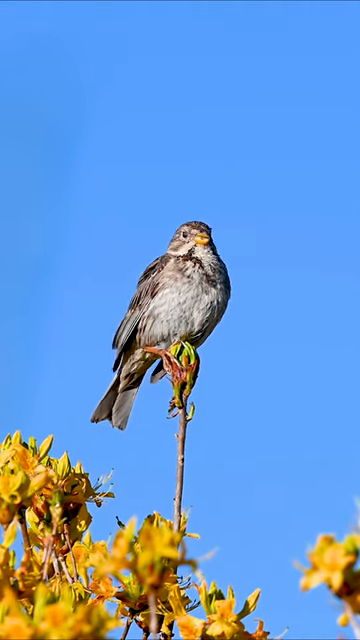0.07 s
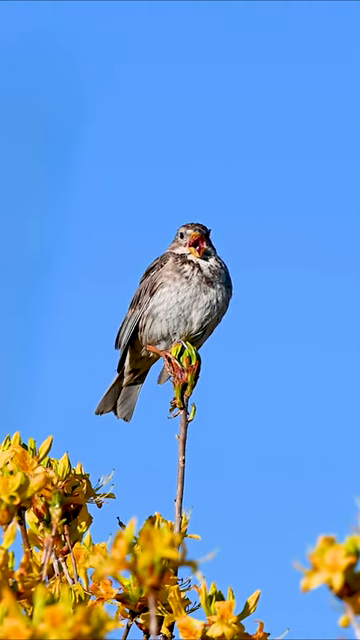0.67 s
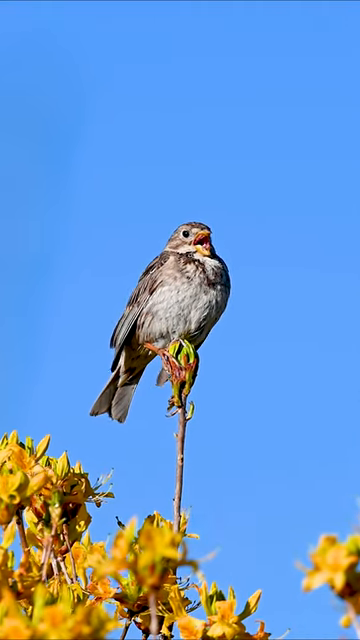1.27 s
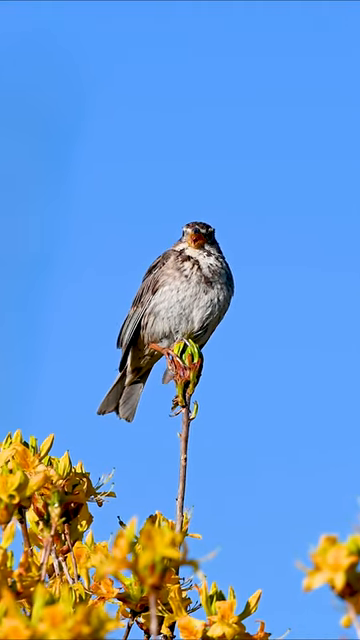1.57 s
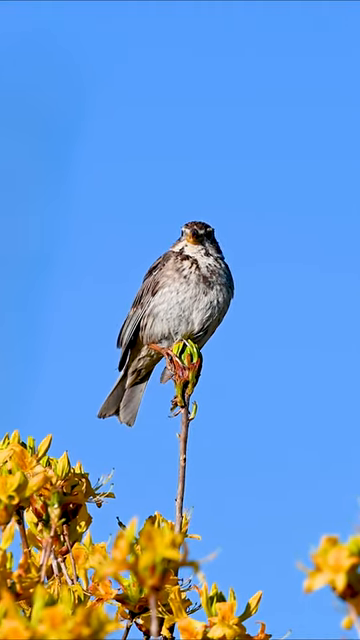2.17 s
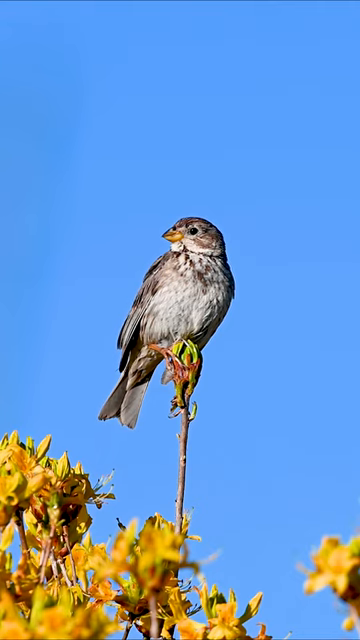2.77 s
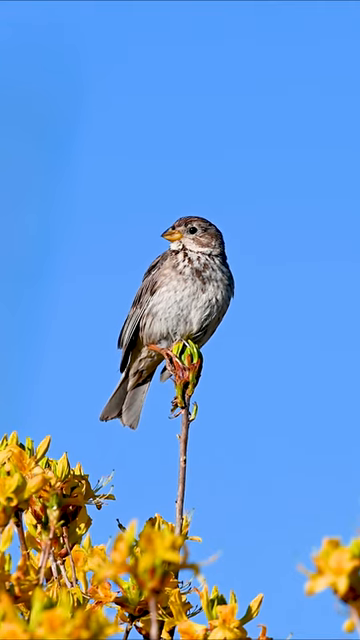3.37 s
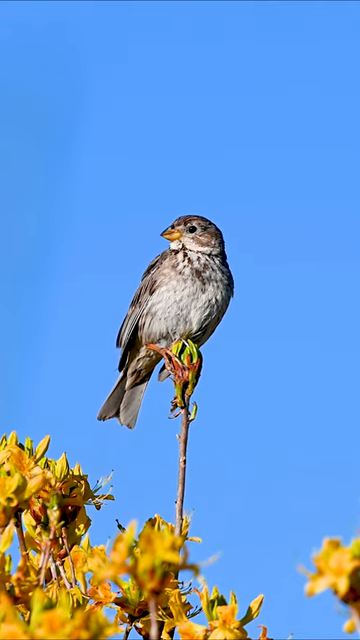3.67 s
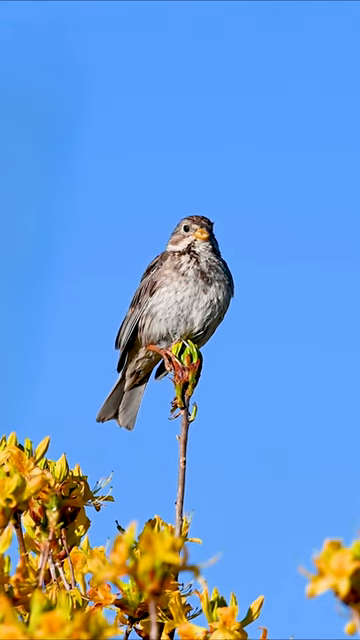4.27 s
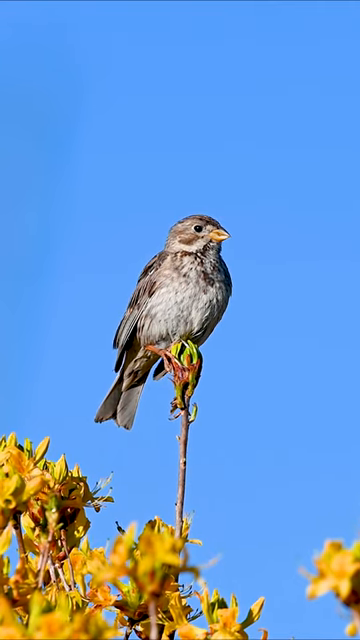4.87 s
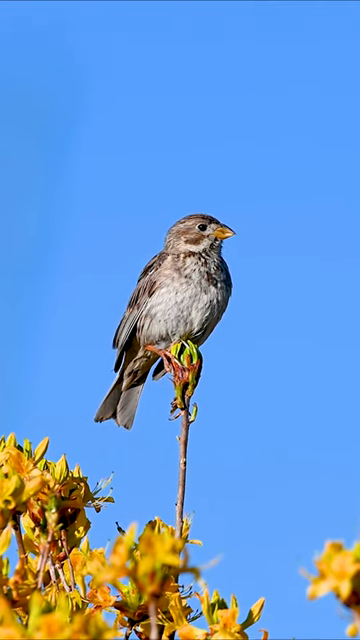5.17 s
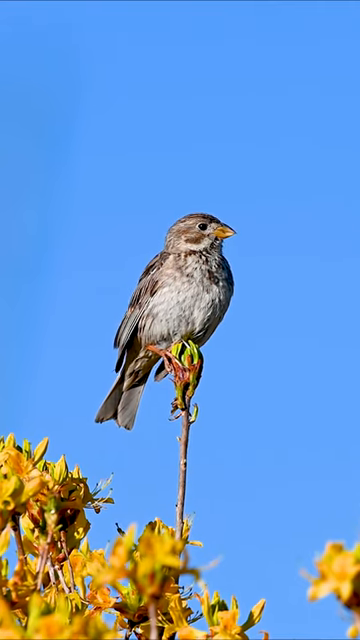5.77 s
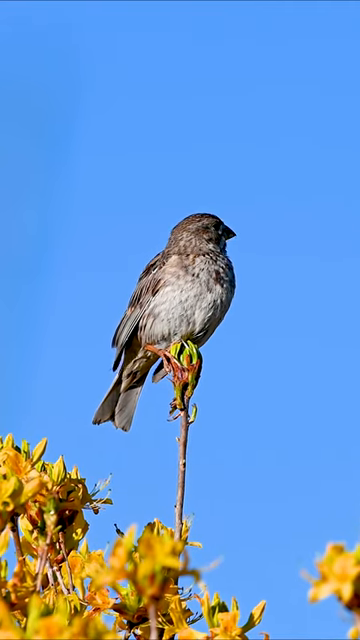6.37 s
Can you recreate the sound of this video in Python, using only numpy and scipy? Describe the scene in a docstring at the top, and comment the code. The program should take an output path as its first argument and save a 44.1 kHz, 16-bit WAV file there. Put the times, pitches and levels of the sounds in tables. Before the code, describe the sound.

Outdoors among bushes, a small bird close to the stereo microphones gives a few buzzy ticks that speed up into a high, jangling rattle, with a faint warble far behind it. After the rattle, a distant bird repeats quiet runs of falling chirps and a level whistle. Two soft, dull bumps sound nearby, and the close bird ticks once more at the end. A soft hush of open air continues throughout.

```python
"""Open air among bushes, a stereo pair in a soft hush. Close by, a corn bunting's buzzy ticks speed up
into a jangling rattle: both sides of its syrinx sing at once and mix in the throat, and the bushes
scatter a short tail. A faint warble lies far behind it. After the rattle a distant bird repeats runs
of falling chirps and a level whistle, and two soft bumps sound nearby.
At the end the bunting gives one more tick."""
import sys
import numpy as np
from scipy import signal
from scipy.fft import rfft, irfft
from scipy.io import wavfile
from scipy.ndimage import uniform_filter1d

SR = 44100
rng = np.random.default_rng(int(sys.argv[2]) if len(sys.argv) > 2 else 0)


def master_out(mix):
    """Clip the mix to full scale and print it as 16-bit PCM to the path in sys.argv[1]."""
    frames = np.transpose(np.atleast_2d(mix))
    ceiling = np.clip(frames, -1, 1)
    pcm = np.round(ceiling * 32767).astype(np.int16)
    wavfile.write(sys.argv[1], SR, pcm)


N = 282681
TIME = np.arange(N) / SR
BIN_HZ = np.maximum(np.arange(N // 2 + 1) * SR / N, 1)


def undb(db):
    """Decibels to gain."""
    return 10 ** (np.asarray(db) / 20)


def across(points):
    """A (Hz, value) table read at every frequency bin."""
    hz, value = np.transpose(points)
    return np.interp(np.log(BIN_HZ), np.log(hz), value)


def colour(x, gain):
    """Filter with a gain for each frequency bin."""
    return irfft(rfft(x) * gain, N)


def walk(rate_hz, size):
    """A random wander with a spread near 1."""
    points = rng.standard_normal(N // 8)
    return np.interp(np.arange(size) * rate_hz / SR, np.arange(len(points)), points)


def add(track, s, x):
    """Mix a sound in at s seconds."""
    i = int(s * SR)
    track[i:i + len(x)] += x[:max(N - i, 0)]


def progress(ms):
    """Runs from 0 to 1 over a note; called u below."""
    return np.linspace(0, 1, int(ms * SR / 1000))


def swell(u, edge):
    """Air pressure rises and falls over a note; edge is the share that each ramp takes."""
    return np.sin(np.pi / 2 * np.clip(np.minimum(u, 1 - u) / edge, 0, 1)) ** 2


def tone(hz):
    """A sine that follows a pitch curve."""
    return np.sin(2 * np.pi * np.cumsum(hz) / SR)


def arc(ms, start_hz, middle_hz, end_hz):
    """Membrane tension bends the pitch through three points."""
    offset = progress(ms) - .5
    return middle_hz + (end_hz - start_hz) * offset + 2 * (start_hz + end_hz - 2 * middle_hz) * offset ** 2


def slur(hz, rough, edge, flutter_hz=950, chop=0.15):
    """One note along a pitch curve; a rough note also flutters in pitch and strength."""
    u = np.linspace(0, 1, len(hz))
    flutter = tone(flutter_hz * (1 + 0.63 * walk(600, len(u))))
    hz = hz + rough * (480 * flutter + 330 * walk(2810, len(u)))
    return swell(u, edge) * (1 + rough * chop * flutter) * tone(hz)


def scatter(x, t60, delay_s):
    """Many small reflections, different at each microphone."""
    t = np.arange(SR // 2) / SR
    tail = rng.standard_normal((2, len(t))) * undb(-60 * t / t60) * np.clip(t / delay_s - 1, 0, 1)
    tail /= np.sqrt(np.sum(tail ** 2, axis=1, keepdims=True))
    return signal.fftconvolve(x[None], tail, axes=1)[:, :N]


def air(level_db=-53.5, drone_hz=71, drone_width_hz=9, drone_db=6.0, gust_db=-2.1):
    """A smooth hush all round the microphones, with a low drone; its bass stirs with the breeze."""
    # The open air. Each row: frequency in Hz, relative noise density in dB.
    spectrum = [(15, -51), (25, -5.5), (76, -3), (99, -3.5), (184, -5.5), (291, -8), (324, -9.5),
                (414, -11), (691, -12.5), (1930, -17.5), (2730, -17.5), (3130, -18), (6490, -22),
                (13100, -31), (15800, -33.5)]
    # Its stereo width. Each row: frequency in Hz, side minus mid in dB.
    width = [(60, -5), (140, -1.5), (300, -1.05), (4000, 0.4), (14000, 0)]
    shape = undb(across(spectrum) + drone_db * np.exp(-((BIN_HZ - drone_hz) / drone_width_hz) ** 2))
    mid, side = colour(rng.standard_normal((2, N)), np.array([shape, shape * undb(across(width))]))
    hush = np.array([mid + side, mid - side]) / np.std(colour(mid, BIN_HZ < 2000))
    bass = colour(hush, 1 / (1 + (BIN_HZ / 300) ** 2))
    breeze = undb(gust_db * walk(5.61, N))
    return undb(level_db) * (hush + bass * (breeze - 1))


def bumps():
    """Soft bumps near the microphones: brief dull swells of noise."""
    # Each row: start in seconds, length in seconds, centre in Hz, width in octaves, gain in dB.
    swells = [(2.937, 0.085, 190, 0.95, -23.5), (5.913, 0.049, 990, 1, -34)]
    out = np.zeros(N)
    for s, length, hz, octaves, db in swells:
        band = colour(rng.standard_normal(N), np.exp(-(np.log2(BIN_HZ / hz) / octaves) ** 2))
        out += undb(db) * swell((TIME - s) / length, 0.8) * band
    return out


def far_chirps(settled_gap_s=.146, settle_chirps=2, wander=0.0066):
    """Each chirp has a rough head and a straight fall; every run slows toward the same pace."""
    # One chirp. Each row: seconds from its start, pitch in Hz, relative level in dB, roughness 0-1.
    contour = [(0, 4450, -15, .8), (.008, 4420, -7, .8), (.024, 4350, -4, .5), (.04, 3850, -7, .1),
               (.055, 3480, -3, .1), (.066, 3220, 2, .1), (.078, 2950, -3, .1), (.09, 2650, -12, .1)]
    # Each row: start in seconds, number of chirps, first gap in seconds, first and last gain in dB.
    runs = [(1.688, 7, .122, -45.8, -45.8), (2.619, 1, .140, -53, -53), (2.665, 3, .141, -48.3, -45.7),
            (3.625, 5, .124, -42.2, -43.4), (4.912, 3, .132, -50.5, -47.5), (5.338, 4, .146, -47.2, -45.3)]
    times, *columns = np.transpose(contour)
    t = TIME[:int(times[-1] * SR)]
    hz, contour_db, rough = (np.interp(t, times, column) for column in columns)
    out = np.zeros(N)
    for s, chirps, first_gap_s, first_db, last_db in runs:
        for k, db in enumerate(np.linspace(first_db, last_db, chirps)):
            pitch_hz = hz * (1 + wander * walk(61.7, len(t)))
            burr_hz = 260 * rough * walk(764, len(t))
            add(out, s, undb(db + contour_db) * tone(pitch_hz + burr_hz))
            s += settled_gap_s + (first_gap_s - settled_gap_s) * np.exp(-k / settle_chirps)
    return out


def far_warble():
    """A faint string of rough, arched notes."""
    # Each row: start in seconds, pitch near the top of the arch in Hz, gain in dB.
    notes = [(1.121, 3100, -49.5), (1.177, 3200, -49.5), (1.233, 3250, -46), (1.316, 3100, -49),
             (1.376, 3200, -47.5), (1.441, 3100, -52.5)]
    arch = arc(46, 0.65, 0.99, 0.78)
    out = np.zeros(N)
    for s, top_hz, db in notes:
        add(out, s, undb(db) * slur(top_hz * arch, rough=0.68, edge=0.2))
    return out


def far_whistles(scoop_hz=750, scoop_s=.02, quaver_hz=110, rise_db=4):
    """The whistle scoops up to a burred, level pitch and swells."""
    # Each row: start in seconds, length in seconds, pitch in Hz, opening gain in dB.
    notes = [(3.166, 0.31, 2710, -53), (4.426, 0.29, 2723, -55.5), (6.10, 0.319, 2750, -55)]
    out = np.zeros(N)
    for s, length, pitch_hz, db in notes:
        t = TIME[:int(length * SR)]
        hz = pitch_hz - scoop_hz * np.exp(-t / scoop_s) + quaver_hz * walk(900, len(t))
        add(out, s, undb(db + rise_db * t / length) * swell(t / length, 0.026) * tone(hz))
    return out


def far_bird(direct_db=-4, field_db=-6):
    """From far across the field, the song arrives with nearly as much scatter as direct sound."""
    song = far_chirps() + far_warble() + far_whistles()
    return undb(direct_db) * song + undb(field_db) * scatter(song, t60=0.035, delay_s=0.0005)


def treble_hiss(hiss_drive, spectrum):
    strength = np.sqrt(np.maximum(uniform_filter1d(hiss_drive ** 2, size=40), 0))
    return colour(strength * rng.standard_normal((2, N)), undb(across(spectrum)))


def hoarseness(s):
    """How rough the bunting's voice is at s seconds."""
    # Each row: time in seconds, roughness 0-1.
    roughness = [(.6, 0.6), (1.0, 0.62), (1.1, 0.12), (1.19, 0.68), (1.33, 0.4), (1.37, 0.1), (1.41, 0.55),
                 (1.58, 0.38), (1.64, 0.09)]
    return np.interp(s, *np.transpose(roughness))


def ticks(bend_hz=268.8, waver_hz=168, bend_lag_rad=1.63, depth=0.56, edge=0.52, throat_hz=3500):
    """Rising notes chopped by a fast flutter; also returns the signal that the treble hiss follows."""
    # Each row: start in seconds, length in ms, start and end pitch in Hz, level in dB,
    # buzz rate in Hz, hiss drive in dB relative to the note.
    notes = [(.080, 16, 4620, 5320, -14.5, 770, -7), (.242, 17.4, 4630, 5410, -8, 712, -11),
             (0.367, 17.9, 4870, 5280, -7, 724, -9.5), (.479, 23.2, 4380, 5140, -12, 715, -4),
             (.513, 26, 4440, 5320, -12.5, 710, -2), (.55, 22.7, 4540, 5250, -11.5, 694, -3),
             (6.335, 16, 4540, 4820, -24, 910, -10)]
    out, hiss_drive = np.zeros((2, N))
    for s, ms, start_hz, end_hz, db, buzz_hz, hiss_db in notes:
        u = progress(ms)
        phase = 2 * np.pi * np.cumsum(buzz_hz * (1 + 0.065 * walk(724, len(u)))) / SR
        flutter_hz = waver_hz * walk(2740, len(u)) - bend_hz * np.sin(phase - bend_lag_rad) ** 3
        hz = start_hz + (end_hz - start_hz) * u + flutter_hz
        pulsing = (1 + depth * np.sin(phase)) / (1 + depth / 2)
        note = undb(db) * swell(u, edge) * pulsing * tone(hz)
        add(out, s, note)
        add(hiss_drive, s, undb(hiss_db) * note)
    throat = 1 / (1 + (throat_hz / BIN_HZ) ** 20)  # passes little below its resonance
    return colour(out, throat), hiss_drive


def trills(detune=0.012, settle=0.26, slip_ms=.3, uneven_db=1.0, edge=.45):
    """In each pulse the high side rises and the low side, a moment later, falls to its resting pitch."""
    # Each row: start in seconds, period in ms, pulses, pulses before the low side joins, high pitch,
    # low pitch and low side's fall in Hz, first and last level in dB, low side's relative level in dB.
    runs = [(0.602, 10.6, 4, 0, 7380, 5170, 2180, -16, -16.5, 0.5),
            (0.6814, 6.6, 9, 0, 7490, 5550, 400, -17.5, -13, -4),
            (0.841, 6.9, 3, 0, 7880, 5550, 300, -17.5, -13.5, 0.5),
            (0.961, 4.3, 8, 0, 7700, 5500, 100, -17, -14, -0.5),
            (1.052, 7.9, 2, 0, 7850, 5700, 700, -16.5, -14.5, -3),
            (1.122, 11.1, 6, 2, 7710, 5300, 2200, -19, -15, -1.5),
            (1.296, 13.1, 4, 1, 7460, 4950, 2200, -13.5, -13, -9),
            (1.3908, 13.1, 4, 1, 7470, 5000, 1100, -16.5, -12.5, -11),
            (1.5421, 14.8, 4, 0, 7490, 4950, 900, -18, -14, -7)]
    high_length, low_length, low_lag = 1.12, 0.93, 0.19  # in periods
    out = np.zeros(N)
    for s, period_ms, pulses, solo, high_hz, low_hz, fall_hz, first_db, last_db, low_db in runs:
        rise_hz = 4800 / period_ms  # slower trills rise less
        high = high_hz + rise_hz * (progress(high_length * period_ms) - .5)
        low = low_hz + fall_hz * np.exp(-progress(low_length * period_ms) / settle)
        rough = hoarseness(s)
        for k, db in enumerate(np.linspace(first_db, last_db, pulses)):
            push, slip, high_tension, low_tension = rng.standard_normal(4)
            at = s + (k * period_ms + slip_ms * slip) / 1000
            gain = undb(db + uneven_db * push)
            add(out, at, gain * slur(high * (1 + detune * high_tension), rough, edge))
            if k >= solo:
                low_note = slur(low * (1 + detune * low_tension), rough, edge)
                add(out, at + low_lag * period_ms / 1000, gain * undb(low_db) * low_note)
    return out


def plunges(knee=.45, width=0.2, edge=0.24, strain=1.5):
    """The pitch hangs high, drops steeply and levels out; strain makes it rougher than other notes."""
    # Each row: start in seconds, length in ms, start and landing pitch in Hz, level in dB.
    notes = [(.593, 5.8, 6700, 5500, -22), (.645, 13.8, 7300, 5310, -11), (0.7941, 9.9, 6500, 5400, -12.5),
             (0.898, 7, 6730, 5280, -12), (0.907, 7.5, 6570, 5370, -9), (0.938, 13, 6100, 5400, -17),
             (0.993, 10, 6010, 5330, -19), (1.044, 8.6, 7500, 5600, -16), (1.067, 10.7, 7310, 5750, -12.5),
             (1.08, 10, 7230, 5640, -9.5), (1.6099, 26, 7530, 5410, -12), (1.650, 18.5, 7410, 5390, -13)]
    out = np.zeros(N)
    for s, ms, start_hz, landing_hz, db in notes:
        height = (1 - np.tanh((progress(ms) - knee) / width)) / 2
        hz = landing_hz + (start_hz - landing_hz) * height
        add(out, s, undb(db) * slur(hz, strain * hoarseness(s), edge, chop=0.29))
    return out


def flicks(high_hz=(7540, 7640, 8200), low_hz=(6500, 5610, 5550), fork_at=0.34, fork_share=0.32):
    """The high side slides up; partway through, the low side forks downward."""
    # Each row: start in seconds, length in ms, high side's and low side's level in dB.
    notes = [(.737, 21.4, -12.5, -10.5), (.751, 12, -16.5, -21.5), (.802, 12.2, -10, -19.5),
             (.814, 15.2, -12.5, -14.5), (.862, 14.6, -9, -14), (.913, 11.6, -9, -18.5),
             (.925, 15, -12.5, -16), (.947, 15, -14, -11.5), (1.017, 21.5, -10, -16),
             (1.087, 6.7, -17.5, -26), (1.189, 17.4, -19, -36)]
    out = np.zeros(N)
    for s, ms, high_db, low_db in notes:
        high = slur(arc(ms, *high_hz), hoarseness(s), edge=0.62)
        low = slur(arc(fork_share * ms, *low_hz), hoarseness(s), edge=0.62)
        add(out, s, undb(high_db) * high)
        add(out, s + fork_at * ms / 1000, undb(low_db) * low)
    return out


def buzzes(swell_db=14, bend_hz=450, depth=0.25, edge=.14, rough=0.62):
    """A fast-pulsed note that climbs as the air pressure builds; the pitch dips through each pulse."""
    # Each row: start in seconds, length in ms, start and end pitch in Hz, pulse rate in Hz, final dB.
    notes = [(.763, 33, 4920, 5640, 202.4, -12), (0.828, 13, 5600, 6120, 560, -7.5),
             (.883, 15, 5700, 6180, 420, -7.5), (1.001, 12, 5600, 5850, 620, -6),
             (1.077, 9, 5900, 7080, 500, -6.5), (1.286, 7.9, 7350, 7560, 220, -19.5)]
    out = np.zeros(N)
    for s, ms, start_hz, end_hz, pulse_hz, db in notes:
        u = progress(ms)
        phase = 2 * np.pi * pulse_hz * TIME[:len(u)]
        pulsing = (1 + depth * np.sin(phase)) / (1 + depth / 2)
        hz = start_hz + (end_hz - start_hz) * u + bend_hz * np.cos(phase)
        add(out, s, undb(db - swell_db * (1 - u)) * pulsing * slur(hz, rough * hoarseness(s), edge))
    return out


def held_notes(crest=.64, scoop_hz=420, scoop_share=.05, edge=0.18, flutter_hz=630):
    """One side's tone scoops up, swells and sags; also returns the signal that the treble hiss follows."""
    # Each row: start in seconds, length in ms, pitch and sag in Hz, crest level in dB, swell in dB,
    # octave overtone's relative level in dB, roughness 0-1.
    notes = [(1.205, 51.6, 6480, 420, -12.5, 1.5, -14, 0.06), (1.351, 37, 5740, 249, -9.5, 4.5, -27, 0.3),
             (1.355, 46, 5070, 161, -11.5, 11.5, -20, 0), (1.471, 44, 5928, 190, -8, 12.5, -31.5, .02)]
    out, hiss_drive = np.zeros((2, N))
    for s, ms, pitch_hz, sag_hz, db, swell_db, octave_db, rough in notes:
        u = progress(ms)
        sag = np.sin(np.pi / 2 * np.clip((u - crest) / (1 - crest), 0, 1)) ** 2
        flutter = 600 * tone(np.full(len(u), flutter_hz)) + 300 * walk(2800, len(u))
        hz = pitch_hz - scoop_hz * np.exp(-u / scoop_share) - sag_hz * sag + rough * flutter
        envelope = undb(db - swell_db * np.maximum(1 - u / crest, 0)) * swell(u, edge)
        note = envelope * (tone(hz) + undb(octave_db) * tone(2 * hz))
        add(out, s, note)
        add(hiss_drive, s, rough * note)
    return out, hiss_drive


def rattle(low_hz=4600, high_hz=8500):
    """Notes from the two sides of the syrinx overlap and beat inside the throat's pass band."""
    throat = 1 / np.sqrt(1 + (low_hz / BIN_HZ) ** 60 + (BIN_HZ / high_hz) ** 60)
    return colour(trills() + plunges() + flicks() + buzzes(), throat)


def bunting(right_lead_us=13, mixing_db=-3, hiss_db=-7, twig_db=-13, bush_db=-21):
    """The close song reaches the right microphone first; near twigs and farther bushes scatter it."""
    # Colour of the throat's overtones. Each row: frequency in Hz, gain in dB.
    overtone_colour = [(1000, -31.5), (2200, -12), (2700, -8), (3500, -22), (9000, -2.5), (10500, -10),
                       (13000, 2), (15200, -1.5)]
    # Colour of the treble hiss during the rattle and the ticks. Each row: frequency in Hz, gain in dB.
    rattle_hiss = [(1000, -46), (2400, -14.5), (3200, -15), (4000, -15.5), (9400, -20.5), (10600, 5),
                   (11700, -3), (13200, 10.5), (14300, -21.5), (15200, -10), (16000, -17.5)]
    tick_hiss = [(2500, -22), (6000, -4), (9000, 2), (11500, -18.5), (13700, -3.5), (16000, -24)]
    # The singer at the two microphones. Each row: frequency in Hz, left minus right in dB.
    balance = [(4800, -0.5), (5500, 2), (5950, -11.5), (6500, -5.5), (7000, -1), (7450, 6.5), (8200, -4),
               (13000, 1.5)]
    ticking, tick_hiss_drive = ticks()
    jangle = rattle()
    held, held_hiss_drive = held_notes()
    voice = ticking + jangle
    # the throat adds sum and difference tones of the two sides
    overtones = colour(voice ** 2, undb(across(overtone_colour)) * (BIN_HZ > 800))
    song = voice + undb(mixing_db) * overtones + held
    hiss = undb(hiss_db) * treble_hiss(jangle * hoarseness(TIME) + held_hiss_drive, rattle_hiss)
    hiss += treble_hiss(tick_hiss_drive, tick_hiss)
    # each microphone takes half of the level and time difference
    left = undb(across(balance) / 2) * np.exp(-1j * np.pi * BIN_HZ * right_lead_us / 1e6)
    direct = colour(song, np.array([left, 1 / left])) + hiss
    twigs = scatter(song + hiss[0], t60=0.098, delay_s=0.0021)
    bushes = scatter(song + hiss[0], t60=0.082, delay_s=0.0038)
    return direct + undb(twig_db) * twigs + undb(bush_db) * bushes


def scene():
    """The close singer, the far bird, soft bumps and the open air at the stereo pair."""
    return bunting() + far_bird() + bumps() + air()


def record(dry, top_hz=15800):
    """The recorder cuts the top steeply."""
    return signal.sosfilt(signal.ellip(10, .1, 80, top_hz, fs=SR, output="sos"), dry)


dry = scene()
out = record(dry)
master_out(out)
```